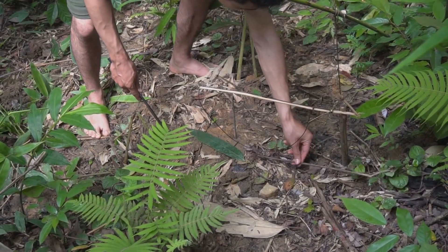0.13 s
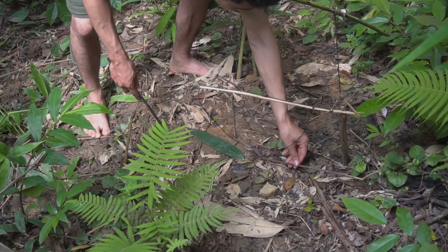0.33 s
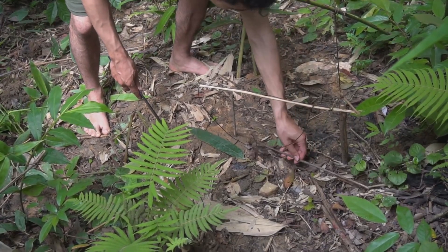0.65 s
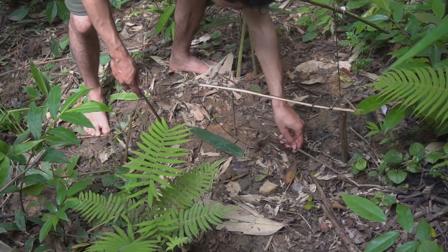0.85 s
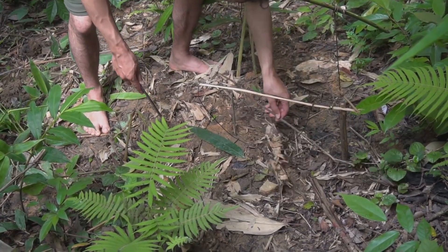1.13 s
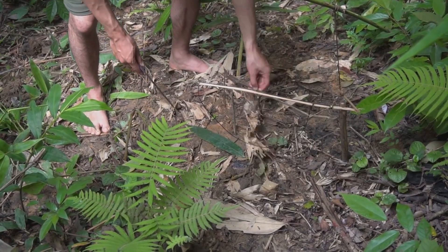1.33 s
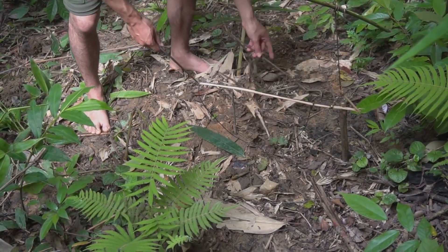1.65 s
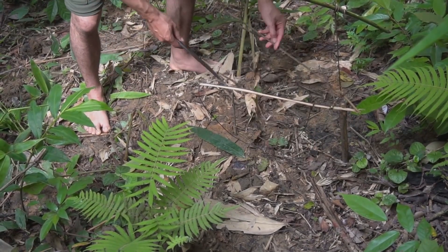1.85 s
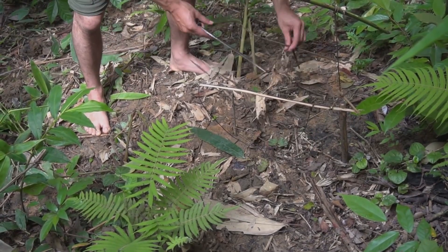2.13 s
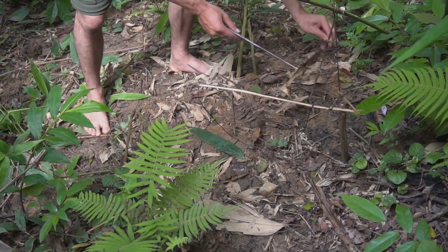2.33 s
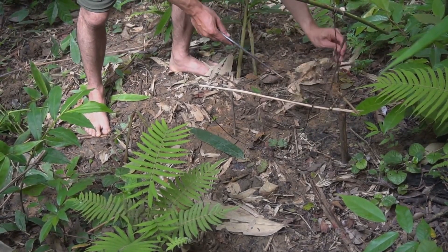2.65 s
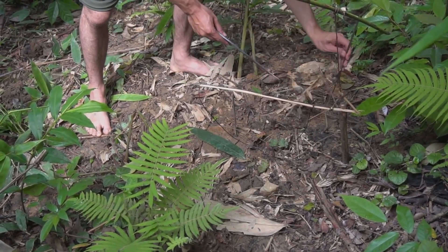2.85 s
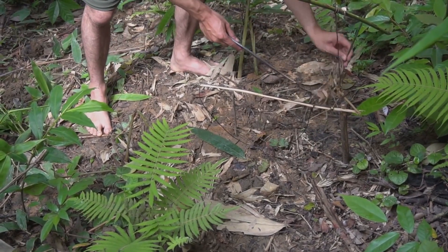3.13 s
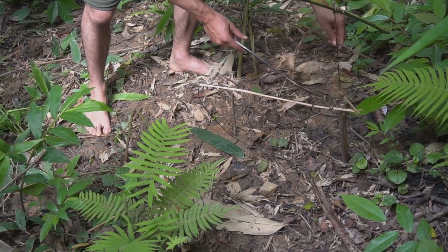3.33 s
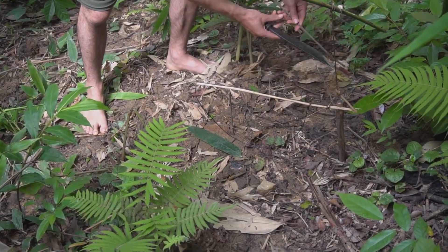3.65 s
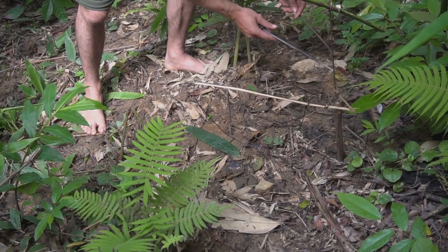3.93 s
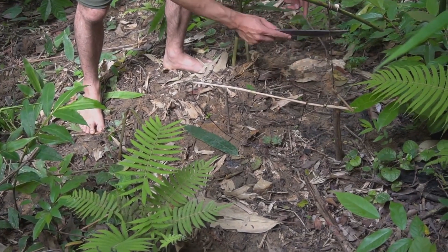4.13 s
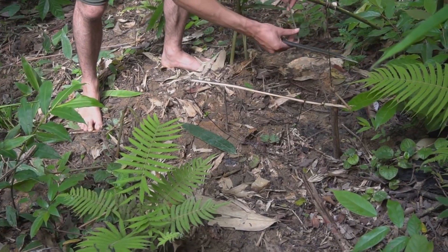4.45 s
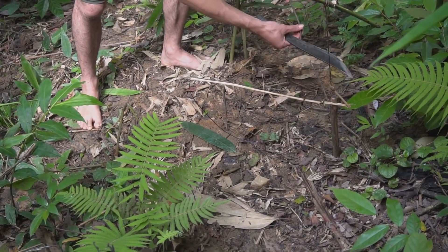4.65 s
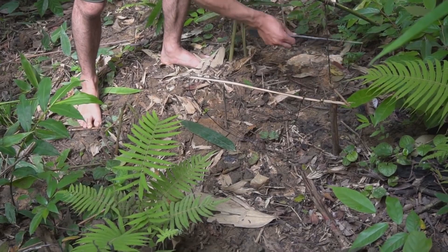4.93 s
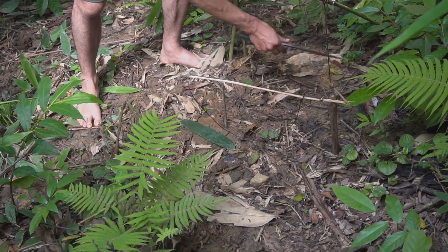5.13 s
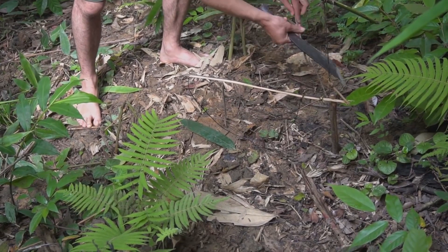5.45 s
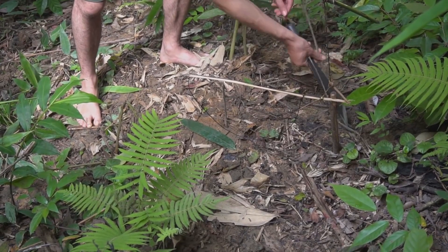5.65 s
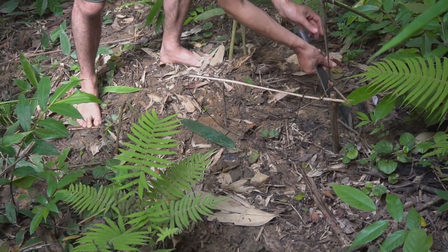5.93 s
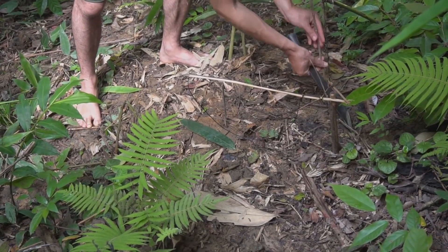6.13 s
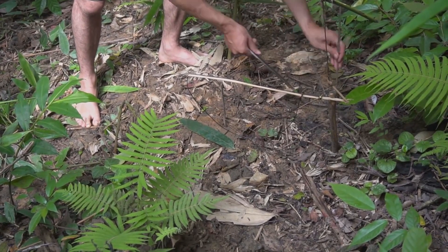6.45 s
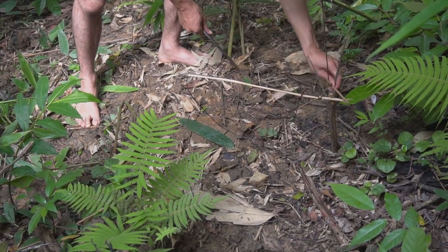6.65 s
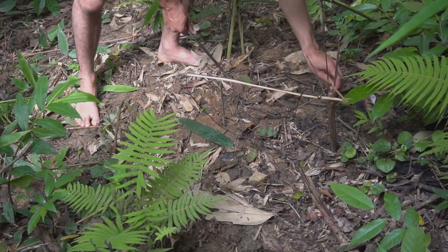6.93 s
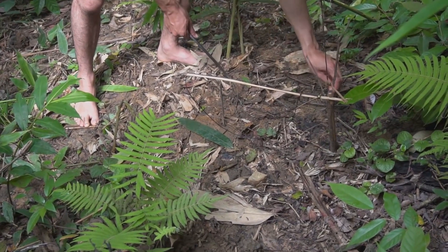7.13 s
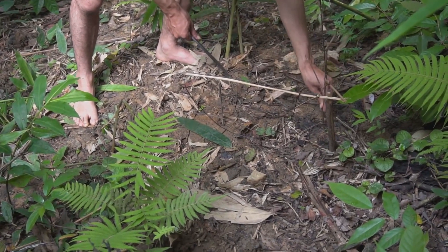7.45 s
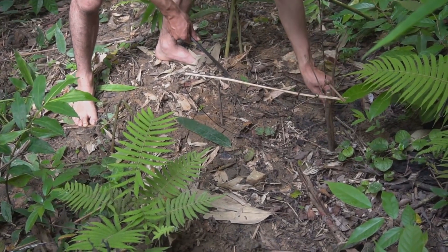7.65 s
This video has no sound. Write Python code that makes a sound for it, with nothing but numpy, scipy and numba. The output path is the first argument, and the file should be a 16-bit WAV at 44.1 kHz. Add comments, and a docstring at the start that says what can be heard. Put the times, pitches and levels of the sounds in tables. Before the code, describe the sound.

Close rustling and snapping as a vine is pulled from dry leaf litter and cut, under a loud, high chorus of forest cicadas.

```python
"""Distant leaves and water hiss in a tropical forest while cicadas and katydids sing.
A cicada's membrane clicks excite the resonances of its belly; trunks and foliage scatter the song.
Close by, a hand pulls a vine out of dry litter: leaves crackle, twigs snap, and a long steel blade
rings in its modes as it trims the vine. A limiter ducks under the loudest snap."""
import sys
import numpy as np
from scipy import signal
from scipy.fft import rfft, irfft, next_fast_len
from scipy.io import wavfile
from scipy.ndimage import uniform_filter1d
from numba import njit

SR = 44100
rng = np.random.default_rng(int(sys.argv[2]) if len(sys.argv) > 2 else 0)


def output_pcm(signal):
    """Save a mono or channel-first signal as 16-bit PCM at the path in sys.argv[1].

    Samples are clipped to [-1, 1] before scaling.
    """
    pcm = np.clip(np.atleast_2d(signal).T, -1, 1) * 32767
    wavfile.write(sys.argv[1], SR, np.round(pcm).astype(np.int16))


N = 343980
TIME = np.arange(N) / SR


def undb(db):
    """Decibels as an amplitude ratio."""
    return 10 ** (np.asarray(db) / 20)


def unit(x):
    """Normalisation to an RMS of 1."""
    return x / np.sqrt(np.mean(x ** 2))


def over_time(table):
    """Linear interpolation of each column after the first (seconds) at every sample."""
    times, *columns = np.transpose(table)
    return [np.interp(TIME, times, column) for column in columns]


def over_spectrum(table):
    """Interpolation of (Hz, value) points in log frequency at every spectral bin."""
    hz, value = np.transpose(table)
    return np.interp(np.log(np.fft.rfftfreq(N, 1 / SR) + 1), np.log(hz), value)


def pan(left_minus_right_db):
    """Level-difference panning: a row of gain for each side."""
    return undb(np.array([left_minus_right_db, -left_minus_right_db]) / 2).reshape(2, -1)


@njit
def resonator(x, hz, width):
    """Second-order resonance: a state-variable band-pass with gain 1 at its moving centre."""
    y, band_state, low_state = np.empty(len(x)), 0., 0.
    for i in range(len(x)):
        g, damping = np.tan(np.pi * hz[i] / SR), width / hz[i]
        band = (band_state + g * (x[i] - low_state)) / (1 + g * (g + damping))
        band_state = 2 * band - band_state
        low_state += 2 * g * band
        y[i] = damping * band
    return y


def mode(x, hz, width):
    """Two equal resonators in cascade give steep skirts; width is that of each, in Hz."""
    hz, width = np.full(N, 1.) * hz, float(width)
    return resonator(resonator(x, hz, width), hz, width)


def drift(rate_hz):
    """Slow random modulation: held values, smoothed twice, with an RMS of 1."""
    hold = int(SR / rate_hz)
    steps = np.repeat(rng.standard_normal(N // hold + 1), hold)
    return unit(uniform_filter1d(uniform_filter1d(steps, hold), hold)[:N])


def clicks(rate_hz, wander, jitter_s, spread_db):
    """A quasi-periodic train of band-limited impulses, uneven in rate, timing and size."""
    cycles = np.cumsum(rate_hz * (1 + wander * drift(12))) / SR
    chance = rng.standard_normal((4096, 2))[:int(cycles[-1])]
    centres = SR * (np.interp(np.arange(len(chance)), cycles, TIME) + jitter_s * chance[:, 0])
    samples = np.clip(centres.astype(int)[:, None] + np.arange(-4, 5), 0, N - 1)
    offset = samples - centres[:, None]
    pulses = np.sinc(offset) * np.cos(offset * np.pi / 10) ** 2 * undb(spread_db * chance[:, 1:])
    return unit(np.bincount(samples.ravel(), pulses.ravel(), N))


def scatter(x, direct_db, t60_s=.63):
    """Multiple scattering: trunks and leaves return a different decaying tail to each side."""
    t = np.arange(int(SR * .4)) / SR
    tails = rng.standard_normal((2, 2, len(t))) * 10 ** (-3 * t / t60_s)
    tails /= np.sqrt(np.sum(tails ** 2, axis=2, keepdims=True))
    size = next_fast_len(N + len(t))
    paths = irfft(rfft(x, size) * rfft(tails, size), size)[..., :N]
    turn = 1.5 * drift(2.5)  # moving air and foliage turn one set of paths into another
    diffuse = np.cos(turn) * paths[0] + np.sin(turn) * paths[1]
    return (diffuse + undb(direct_db) * x) / np.sqrt(1 + undb(2 * direct_db))


# Spectrum of the hiss. Each row: frequency in Hz, relative spectral density in dB.
HISS_SPECTRUM = [(15, -42), (25, -20), (77, -2), (160, -7.5), (255, -7.5), (527, -8.5), (729, -6),
                 (905, -11.5), (1180, -6.5), (1820, -7.5), (2150, -2.5), (2890, -1.5), (3500, -6),
                 (4300, -7.5), (5600, -10), (8730, -19.5), (12700, -21.5), (15800, -28)]
# Likeness of the two sides. Each row: frequency in Hz, correlation from 0 to 1.
HISS_CORRELATION = [(30, .95), (70, 0.99), (130, 0.83), (290, 0.52), (640, 0.59), (1410, 0.67), (3100, 0.4),
                    (6820, 0), (15000, 0.18)]
# Balance of the hiss. Each row: frequency in Hz, left minus right in dB.
HISS_BALANCE = [(200, 0), (700, -1.5), (1800, -2), (4000, 1.5), (12000, -1.5)]


def distant_hiss():
    """Far leaves and water form a diffuse field, alike on both sides at long wavelengths."""
    mid, side = rfft(rng.standard_normal((2, N)))
    alike = np.clip(over_spectrum(HISS_CORRELATION), 0, 1)
    pair = np.sqrt(1 + alike) * mid + np.sqrt(1 - alike) * side * np.array([[1], [-1]])
    spectrum = pair * undb(over_spectrum(HISS_SPECTRUM)) * pan(over_spectrum(HISS_BALANCE))
    return unit(irfft(spectrum, N)) * undb(-35.5 + .5 * drift(3))


# Swell of the far cicadas. Each row: time in seconds, level in dB.
CHORUS_LEVELS = [(0.0, -39.5), (0.61, -43.5), (1.0, -40.5), (1.75, -50), (2.0, -43.5), (2.3, -41),
                 (3.0, -45), (3.65, -40.5), (4.9, -41.5), (5.1, -37), (5.5, -40.5), (5.7, -39.5),
                 (7.8, -39)]


def far_chorus():
    """Incoherent summation: countless clicks merge into noise, and only their shared modes remain."""
    db, = over_time(CHORUS_LEVELS)
    drive = rng.standard_normal(N)
    song = unit(mode(drive, hz=2810, width=760)) + unit(mode(drive, hz=2110, width=200)) * undb(-5.5)
    return scatter(song * undb(db + 1.7 * drift(9.1)), direct_db=-4.5) * pan(-.47)


# Calls of small insects. Each row: start and end in seconds, centre, width and click rate in Hz,
# level in dB.
INSECT_CALLS = [(0, .85, 13400, 800, 120, -59), (.85, 3.2, 13200, 900, 120, -64),
                (5.3, 5.56, 6500, 600, 300, -53), (3.9, 7.8, 6300, 1600, 300, -54),
                (.42, .58, 7630, 200, 200, -61)]


def small_insects():
    """Impulse excitation: each singer's rapid clicks drive a single resonance."""
    song = 0
    for start, end, hz, width, rate_hz, db in INSECT_CALLS:
        gate = np.clip(np.minimum(TIME - start + .053, end - TIME + .037) / .033, 0, 1)
        drive = clicks(rate_hz, wander=.03, jitter_s=.0006, spread_db=3)
        song += unit(mode(drive, hz, width)) * gate * undb(db + 1.5 * drift(5))
    return scatter(song, direct_db=6.4)


# Broad modes of the rasp. Each row: centre in Hz, width in Hz, relative gain in dB.
RASP_MODES = [(4650, 1400, -5), (5250, 350, -9), (5800, 450, -11), (6600, 1200, -13)]
# Phrases about 1.17 s apart. Each row: start in seconds, climb level in dB, delay to full rasp and
# its hold in seconds, rasp level in dB, relative level of its narrow mode in dB.
RASP_PHRASES = [(-.2, -30, 0.38, 0.31, -41.5, 2), (.94, -31, 0.38, .33, -42, 0),
                (2.223, -37, 0.14, 0.39, -39.5, -3), (3.26, -37, 0.28, 0.31, -37, -5),
                (4.38, -36.5, 0.27, 0.35, -40, -4), (5.62, -42, 0.23, 0.37, -37, -10),
                (6.82, -33.5, 0.28, 0.18, -39, 0)]


def rasping_cicada():
    """Swept resonance: ragged clicks drive two climbing belly modes, then settle in high ones."""
    climb_s, from_hz, to_hz = .46, 2700, 4150
    rise_db_per_s, fall_db_per_s = 70, 86
    drive = clicks(rate_hz=185.7, wander=.012, jitter_s=.0004, spread_db=2.5)
    blurred = drive + 1.9 * rng.standard_normal((2, N))
    columns = np.transpose(RASP_PHRASES)
    phrase_start, climb_db, rasp_delay = columns[:3, np.searchsorted(columns[0], TIME) - 1]
    progress = np.clip((TIME - phrase_start) / climb_s, 0, 1)
    hz = to_hz + (from_hz - to_hz) * (1 - progress) ** 3
    upper = mode(blurred[0], hz, width=850)
    lower = mode(blurred[1], hz - 700 * progress, width=900) * undb(-2.5)
    song = unit(upper + lower) * undb(climb_db) * np.abs(np.sin(np.pi * progress ** 1.2)) ** .7
    creeping_hz = 4660 + 330 * np.clip(TIME - phrase_start - rasp_delay, -.1, .5)
    narrow = unit(mode(blurred[0], creeping_hz, width=420))
    broad = unit(sum(undb(db) * mode(drive, centre, width) for centre, width, db in RASP_MODES))
    for start, _, delay, hold, db, narrow_db in RASP_PHRASES:
        age = TIME - start - delay
        fade_db = np.maximum(0, np.maximum(-age * rise_db_per_s, (age - hold) * fall_db_per_s))
        song += (narrow * undb(narrow_db) + broad * undb(-2.5)) * undb(db - fade_db)
    return scatter(song, direct_db=-2.9, t60_s=.12) * pan(2.2)


# Course of the loud buzz. Each row: time in seconds, level in dB, left minus right in dB,
# lower belly mode minus upper in dB.
BUZZ_CONTOUR = [(1.82, -55, 2, 2.5), (1.88, -37.5, 4, 2.5), (2.05, -30, 2.5, -5.5), (2.26, -39.5, 1, 5),
                (2.45, -33, 2, 2), (2.9, -32.5, 4, 0.5), (3.03, -35, 2, 2.5), (3.25, -32.5, 1, -4),
                (3.5, -33, 2, 2.5), (3.81, -29.5, 2, -0.5), (4.2, -31, 1.5, -1.5), (4.5, -30.5, 2, -2.5),
                (4.88, -31, 3, 0), (5.05, -28, -2, 3), (5.44, -28, 0, -1.5), (5.62, -33.5, -0.5, 3.5),
                (5.85, -33, -3, 3), (6.05, -30, -0.5, 2.5), (6.57, -28.5, 0.5, -2.5), (6.86, -34, 2, -1),
                (7.2, -33, 0, 3.5), (7.46, -28.5, -1.5, -3.5), (7.6, -28, 2, -5), (7.8, -29, 0, -1)]
# Swells in one narrow mode. Each row: peak time and length in seconds, level in dB, centre in Hz.
BUZZ_CHIRPS = [(1.89, 0.075, -36.5, 3250), (2.45, 0.06, -41, 3790), (2.658, .065, -44, 3760),
               (2.877, 0.047, -36, 4320), (2.92, .08, -33, 4030), (3.111, 0.081, -32, 4130),
               (3.2, .065, -42, 4100), (3.278, .065, -35, 3520), (3.293, .06, -37, 3780),
               (3.354, 0.06, -35.5, 4050), (3.542, .065, -35, 3790), (3.81, 0.073, -34.5, 4010),
               (4.08, .08, -33.5, 3840), (5.146, 0.13, -46, 3260), (5.404, 0.1, -45, 3250),
               (6.045, 0.1, -38, 3750), (6.05, .15, -45, 3290), (6.484, .12, -41, 3260),
               (7.46, 0.16, -40, 3330)]


def buzzing_cicada():
    """Source and filter: even clicks give a line spectrum, noise blurs it, two belly modes shape it."""
    from_hz, to_hz, climb_s, sag_hz_per_s = 2100, 3788, .072, 71
    offset_hz, width_hz, even_mix = 270, 760, .072
    db, pan_db, lower_db = over_time(BUZZ_CONTOUR)
    age = np.maximum(TIME - BUZZ_CONTOUR[0][0], 0)
    # The belly resonance climbs as the song starts, then sags.
    hz = to_hz + (from_hz - to_hz) * np.exp(-age / climb_s) - sag_hz_per_s * age + 60 * drift(8.7)
    steady = clicks(rate_hz=253, wander=.0013, jitter_s=0, spread_db=2)
    noise = rng.standard_normal((2, N))
    comb = resonator(steady, np.full(N, 3750.), width=900.) * undb(3 * drift(9))
    drive = np.sqrt(1 - even_mix) * noise + np.sqrt(even_mix) * comb
    lower = mode(drive[0], hz - offset_hz, width_hz) * undb(lower_db)
    upper = mode(drive[1], hz + offset_hz, width_hz)
    song = unit(lower - upper) * undb(db + .54 * drift(14)) * (age > 0)
    chirps = 0
    for peak, length, chirp_db, chirp_hz in BUZZ_CHIRPS:
        swell = np.exp(-(2 * (TIME - peak) / length) ** 2)
        chirps += unit(mode(steady, chirp_hz, width=220)) * undb(chirp_db) * swell
    buzz = scatter(song, direct_db=-4.5, t60_s=.1) * pan(pan_db)
    return buzz + scatter(chirps, direct_db=12, t60_s=.17) * pan(5.4)


# Tugs on the vine. Each row: peak time and length in seconds, level in dB, centre in Hz.
VINE_TUGS = [(1.294, .04, -37, 1200), (1.4, 0.057, -37.5, 500), (2.217, 0.014, -33.5, 1500),
             (2.362, 0.044, -49, 1000), (3.773, 0.055, -38.5, 900)]


def vine_tugs():
    """Heavy damping: the vine tears from the soil or knocks a stem with a dull burst of noise."""
    out = 0
    for peak, length, db, hz in VINE_TUGS:
        grit = unit(resonator(rng.standard_normal(N), np.full(N, float(hz)), width=1.6 * hz))
        out += grit * undb(db) * np.exp(-(2 * (TIME - peak) / length) ** 2)
    return out * pan(-1.2)


# Drags through the litter. Each row: peak time in seconds, level in dB, swell and fade in seconds
# per 10 dB.
LEAF_DRAGS = [(0.774, -44, 0.018, 0.027), (.91, -37.5, 0.083, .04), (.97, -32.5, .05, 0.058),
              (1.045, -31, .015, 0.099), (1.39, -29, 0.18, 0.05), (1.462, -39.5, .015, 0.18),
              (1.79, -42, 0.3, 0.043), (2.218, -34, 0.036, 0.029), (2.31, -38.5, .02, 0.37),
              (2.408, -36, .04, .05), (2.75, -39.5, 0.13, 0.067), (2.975, -36, 0.025, 0.14),
              (3.56, -41, 0.072, .03), (3.73, -33.5, 0.072, 0.073), (4.074, -42, 0.044, .06),
              (4.27, -45, 0.11, 0.067), (4.77, -40, .04, .07), (4.926, -28.5, 0.006, 0.22),
              (5.075, -32.5, .03, 0.073), (5.48, -40, 0.016, .03), (5.54, -37.5, 0.018, .03),
              (5.62, -38, 0.046, 0.022), (5.735, -31.5, 0.022, 0.082), (5.876, -32, 0.016, 0.026),
              (6.69, -48, .06, .03), (6.845, -43, 0.012, .03), (6.905, -42, .02, 0.026),
              (7.04, -41, .025, 0.044), (7.32, -41, .04, 0.067), (7.385, -35.5, 0.047, 0.035),
              (7.538, -40, 0.056, 0.049), (7.665, -47, .01, 0.084)]
# Spectrum of dry leaves. Each row: frequency in Hz, relative spectral density in dB.
LEAF_SPECTRUM = [(300, -11), (1500, 0), (3000, 6), (6200, 5.5), (8000, 3.5), (10800, 3), (13500, 3.5),
                 (15800, -2)]


def leaf_rustle():
    """Shot noise: dragged leaves give dense crackles of very unequal size over a hiss."""
    cracks_per_s = 1200
    level_db = np.max([db - 10 * np.maximum((peak - TIME) / swell, (TIME - peak) / fade)
                       for peak, db, swell, fade in LEAF_DRAGS], axis=0)
    timing, polarity, size = rng.random((3, 3, N))
    cracks = (timing < cracks_per_s / SR) * np.sign(polarity - .5) * undb(-3.5 * np.log(size + .02))
    grit = unit(cracks) + .9 * rng.standard_normal((3, N))  # rows: shared, left, right
    leaves = irfft(rfft(grit[0] + 1.5 * grit[1:]) * undb(over_spectrum(LEAF_SPECTRUM)), N)
    # Each leaf has its own pitch, so the brightest band hops about.
    bright_hz = 10500 * np.exp(.22 * np.clip(drift(55), -1.6, 1.6))
    leaves += .9 * np.array([resonator(side, bright_hz, width=2500.) for side in leaves])
    return unit(leaves) * undb(level_db + 2.2 * drift(40)) * pan(-1.8)


# Breaking twigs and fibres. Each row: start in seconds, peak level in dB, centre in Hz.
TWIG_SNAPS = [(0.913, -24, 10800), (0.95, -18, 9850), (0.9574, -29, 8510), (0.9834, -21, 10800),
              (1.043, -19, 7110), (1.3024, -24, 12000), (1.3514, -22, 11000), (1.3994, -19, 7530),
              (1.464, -23, 8830), (2.4104, -24, 10600), (2.7492, -24, 7010), (3.7264, -23, 6250),
              (4.866, -20, 13200), (4.9202, -16, 11300), (4.9244, -6, 8500), (4.9275, -4.5, 13100),
              (4.9664, -15, 11500), (5.7359, -22, 8810), (5.7653, -20, 13000), (5.8706, -27, 10800)]


def twig_snaps():
    """Brittle fracture: a millisecond crack excites a broad resonance, and a short tail follows."""
    t = np.arange(4096) / SR
    out = np.zeros((2, N + len(t)))
    for start, db, hz in TWIG_SNAPS:
        noise = rng.standard_normal((3, len(t)))
        burst = noise[0] * np.exp(-t / .0005)
        ring = resonator(burst, np.full(len(t), float(hz)), width=2800.)
        crack = .19 * np.diff(burst, prepend=0) + 3 * ring
        tail = np.diff(noise[1:], prepend=0) * np.exp(-t / .01) * undb(-21)
        i = int(start * SR)
        out[:, i:i + len(t)] += undb(db) * (crack / np.abs(crack).max() + tail)
    return out[:, :N] * pan(-2.5)


# Brushes on the blade. Each row: start in seconds, drive level in dB, length in seconds,
# extra drive to the upper modes in dB.
BLADE_TOUCHES = [(4.43, -17, 0.051, -3), (5.59, -32, 0.024, -18), (5.622, -31, .01, -18),
                 (5.725, -39, .04, 2), (5.765, -32, .012, 2), (5.87, -25, .012, -12)]
# Modes of the steel. Each row: frequency in Hz, gain in dB, time to decay by 60 dB in seconds.
BLADE_MODES = [(10680, -4, .1), (13065, 0, .1), (14600, -22, .08), (15415, -12, .1)]


def steel_blade():
    """Modal ringing: a gritty touch drives the steel, and the place of contact weights its modes."""
    attack_s = .00095
    grit, ring = rng.standard_normal(N), 0
    for k, (hz, mode_db, t60) in enumerate(BLADE_MODES):
        force = 0
        for start, db, length, upper_db in BLADE_TOUCHES:
            contact = np.clip(np.minimum((TIME - start) / attack_s, 1 - (TIME - start) / length), 0, 1)
            force += contact * undb(db + (upper_db if k else 0)) / np.sqrt(length * SR)
        pole = np.exp(2j * np.pi * hz / SR - np.log(1000) / (t60 * SR))
        ring += undb(mode_db) * signal.lfilter([1], [1, -pole], force * grit).imag
    return ring * pan(-5)


def scene():
    """Superposition: the insects, the work on the vine and the hiss add in stereo."""
    insects = buzzing_cicada() + rasping_cicada() + far_chorus() + small_insects()
    vine_work = leaf_rustle() + vine_tugs() + twig_snaps() + steel_blade()
    return insects + vine_work + distant_hiss()


@njit
def follow_peaks(x, attack_s, release_s):
    """Envelope detection with one time constant for rising and another for falling."""
    level, envelope = 0., np.empty(len(x))
    for i in range(len(x)):
        level += (x[i] - level) / (SR * (attack_s if x[i] > level else release_s))
        envelope[i] = level
    return envelope


def record(dry):
    """Peak limiting: the gain drops at a peak and recovers slowly; a low-pass cuts the top."""
    threshold_db, cutoff_hz = -15, 15850
    peak = follow_peaks(np.abs(dry).max(axis=0), attack_s=.0002, release_s=.2)
    limited = dry * np.minimum(1, undb(threshold_db) / (peak + 1e-9))
    return signal.sosfilt(signal.ellip(10, .2, 80, cutoff_hz, fs=SR, output="sos"), limited)


dry = scene()
out = record(dry)
output_pcm(out)
```